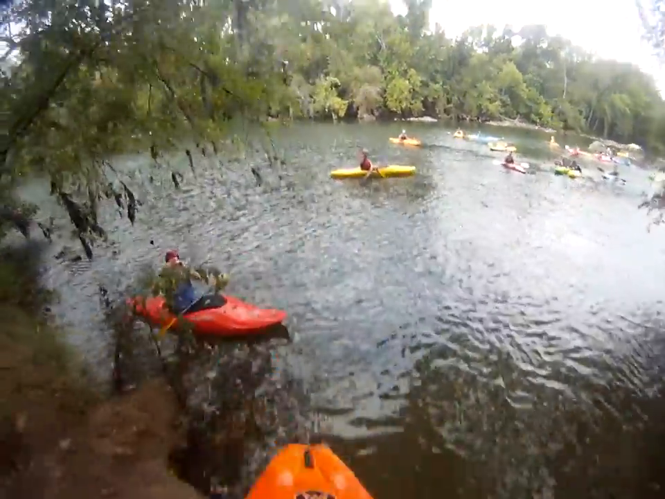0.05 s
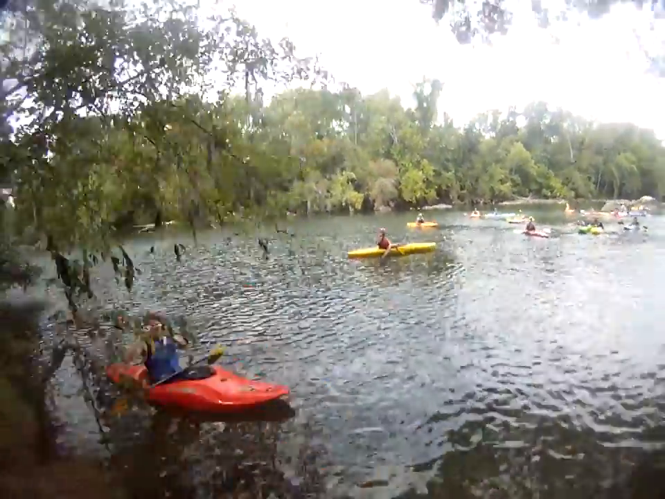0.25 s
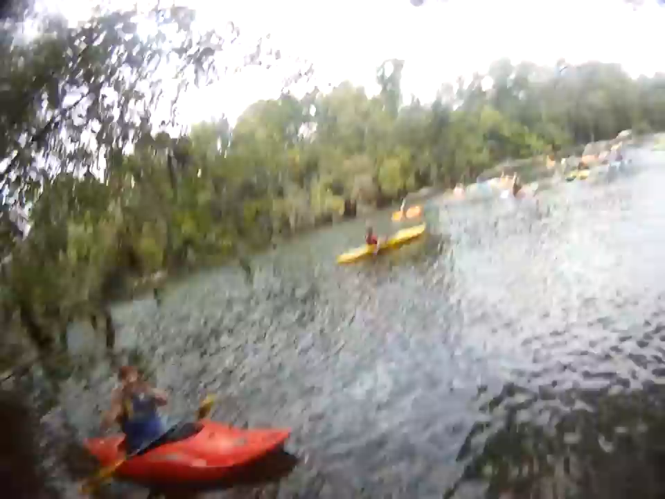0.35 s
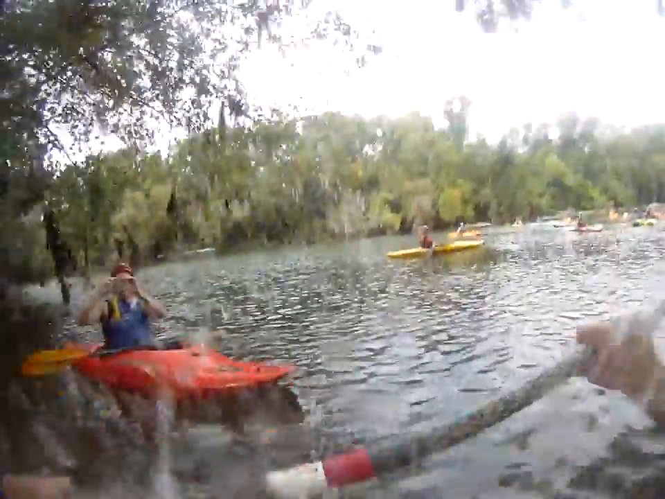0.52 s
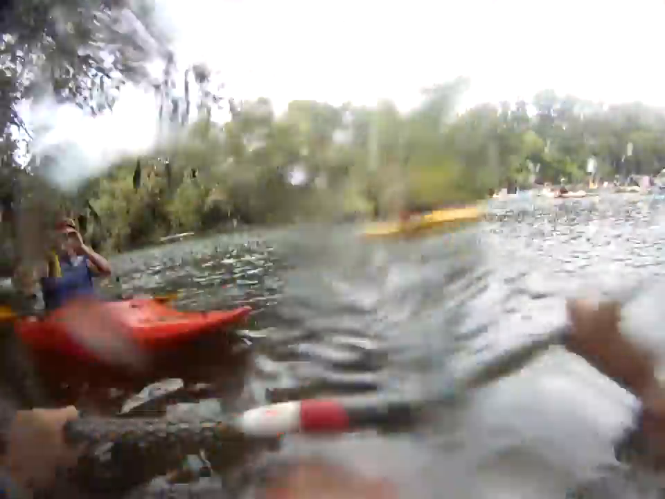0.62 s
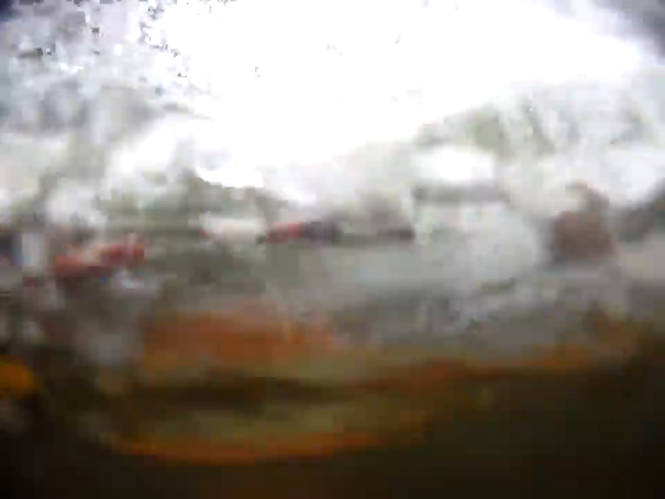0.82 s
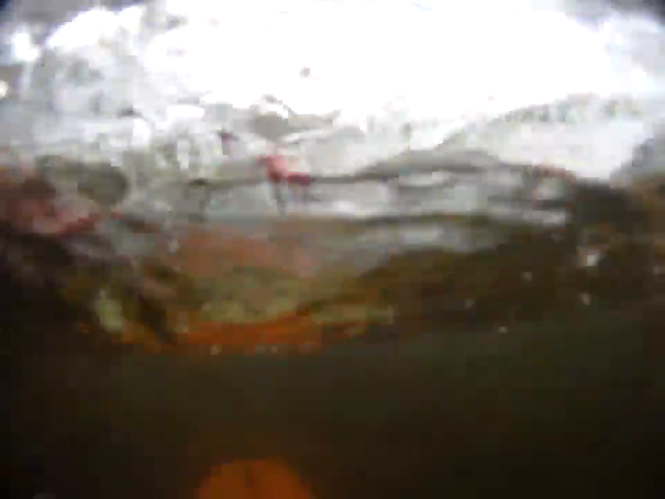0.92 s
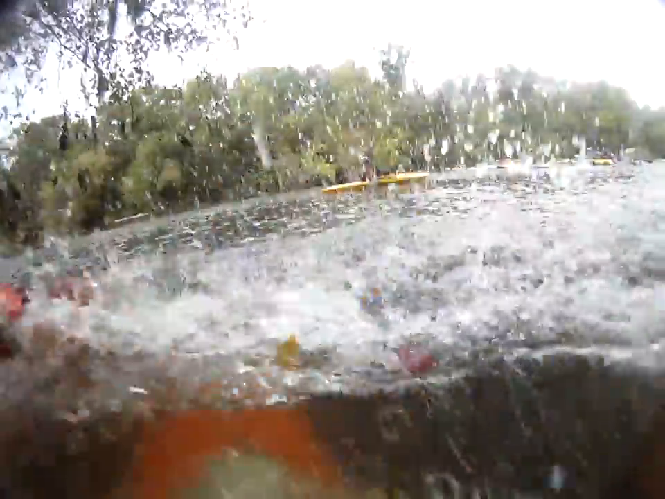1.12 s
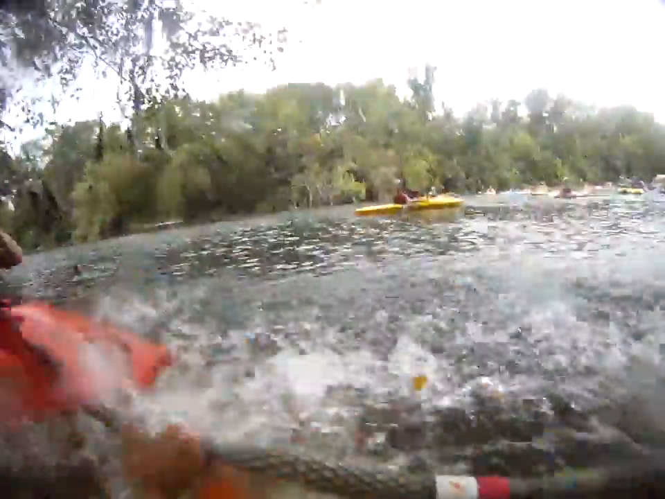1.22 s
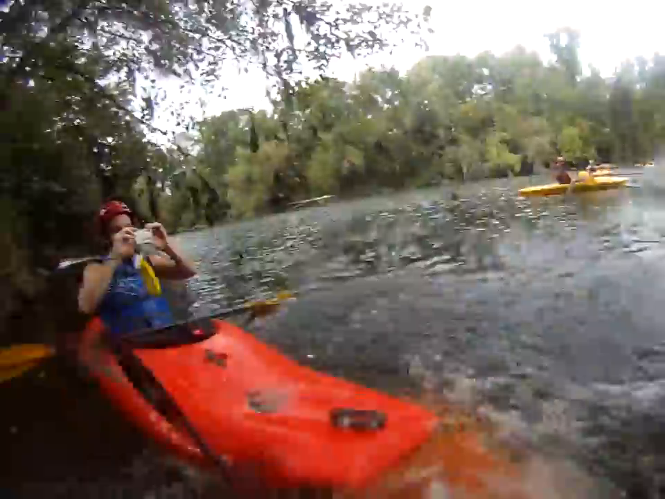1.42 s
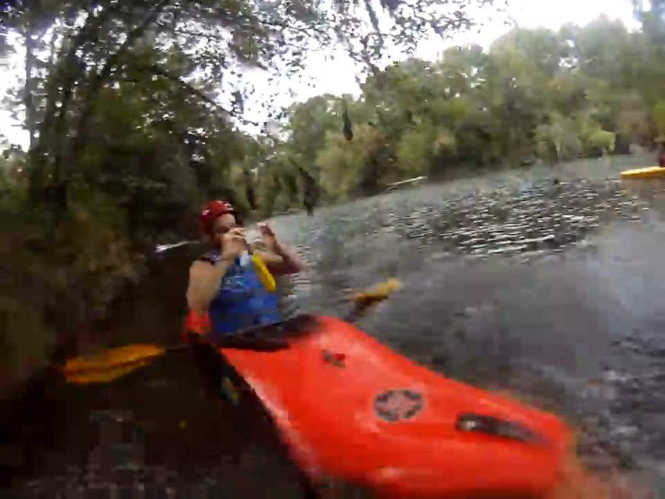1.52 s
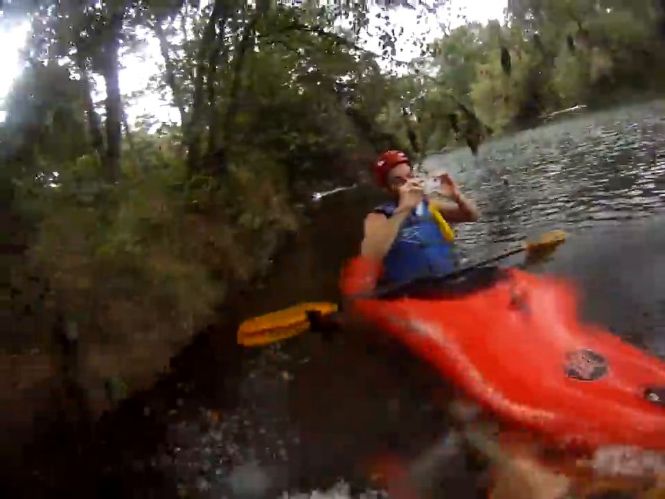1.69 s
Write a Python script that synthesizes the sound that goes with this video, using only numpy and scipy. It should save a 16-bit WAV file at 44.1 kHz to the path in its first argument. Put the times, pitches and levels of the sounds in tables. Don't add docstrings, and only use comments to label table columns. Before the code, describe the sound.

Hollow kayak hull thuds and scrapes on dirt, then plunges into water with crackling splashes and drips

```python
import sys
import numpy as np
from scipy import signal
from scipy.fft import rfft, irfft, next_fast_len
from scipy.io import wavfile
from scipy.ndimage import uniform_filter1d, map_coordinates

SR = 44100
rng = np.random.default_rng(int(sys.argv[2]) if len(sys.argv) > 2 else 0)


def voltage_ratio(level):
    return 10 ** (np.asarray(level, float) / 20)


def materialize(psi):
    bounded = np.clip(np.atleast_2d(psi).T, -1, 1)
    quanta = np.round(bounded * 32767).astype(np.int16)
    wavfile.write(sys.argv[1], SR, quanta)


N = 77175

# (time [s], level [dB])
RIVER_CHURN = [(0, -64), (.03, -57), (.18, -55.5), (.30, -48.5), (.350, -62), (.357, -95), (.41, -57.5),
               (.60, -55), (.63, -44.5), (.72, -35.5), (.82, -24), (.9, -39), (.96, -33), (1.11, -34.5),
               (1.21, -31), (1.27, -30.5), (1.35, -33), (1.75, -35)]
# (frequency [Hz], gain [dB])
HOUSING_TONE = [(300, -11), (830, -5.5), (1150, -7), (1350, 3.5), (2500, 3), (3650, -7), (4000, -11.5),
                (5200, -12.5), (6600, -17)]
SPLASH_S = 0.62


def unit(x):
    return x / np.sqrt(np.mean(x ** 2) + 1e-20)


def along(points, hz):
    f, v = np.transpose(points)
    return np.interp(np.log(hz + 1), np.log(f + 1), v, left=v[0] - 25, right=v[-1] - 25)


def curve(rows):
    s, v = np.transpose(rows)
    return np.interp(np.arange(N) / SR, s, v)


def wobble(rate):
    knots = rng.standard_normal(int(N * rate / SR) + 4)
    return map_coordinates(knots, [np.arange(N) * rate / SR])


def coloured(x, points):
    m = next_fast_len(len(x) + 8192)
    gain = voltage_ratio(along(points, np.fft.rfftfreq(m, 1 / SR)))
    return irfft(rfft(x, m) * gain, m)[:len(x)]


def add(track, s, x):
    part = track[round(s * SR):][:len(x)]
    part += x[:len(part)]


def grains(span_s, hz, cycles, count, size):
    r = rng.random((count, 2))
    spread = np.exp(0.38 * rng.standard_normal(count))
    f = np.clip(hz * spread, 700, 4500)[:, None]
    k = np.arange(400)
    level = voltage_ratio(-3.5 * np.log(0.078 + r[:, 1:]))
    decay = np.exp(-k / SR * f / cycles * 2)
    onset = 1 - np.exp(-k / SR * f * 2)
    wave = level * np.sin(2 * np.pi * f * k / SR) * decay * onset
    at = (r[:, :1] * span_s * SR).astype(int) + k
    return np.bincount(at.ravel(), wave.ravel(), size + len(k))[:size]


def wind():
    # (time [s], level [dB])
    gusts = [(0.0, -21), (0.038, -44), (0.18, -34.5), (0.224, -29), (0.608, -24.5), (0.706, -23.5),
             (0.788, -17), (0.872, -33.5), (1.106, -24.5), (1.324, -28), (1.472, -29), (1.574, -33.5),
             (1.642, -33.5), (1.75, -32)]
    # (frequency [Hz], level [dB])
    rumble_tone = [(15, -18.5), (33, 0), (55, -12), (90, -13), (140, -27.5), (450, -36.5)]
    # (middle [s], length [s], peak [dB], pitch [Hz])
    heaves = [
        (0.066, 0.17, -31, 31.5),
        (0.471, 0.12, -25, 38),
        (0.743, 0.042, -26.5, 57),
        (.922, 0.042, -28, 48),
        (1.126, 0.068, -27.5, 54),
        (1.17, 0.061, -27, 54),
        (1.227, 0.33, -36, 40.2),
        (1.326, 0.3, -21, 31.2),
        (1.563, 0.099, -30, 34.6),
    ]
    t = np.arange(N) / SR
    heave = np.zeros(N)
    for s, length, db, hz in heaves:
        swell = np.exp(-(3 * (t - s) / length) ** 2)
        heave += voltage_ratio(db) * swell * np.sin(2 * np.pi * hz * (t - s))
    hiss = unit(coloured(rng.standard_normal(N), [(200, 14), (800, 2), (3500, -14), (6000, -4)]))
    hiss_db = 0.5 + np.minimum(curve(RIVER_CHURN), -61)
    rumble = unit(coloured(rng.standard_normal(N), rumble_tone))
    rumble_db = curve(gusts) - 6 + 1.4 * wobble(11.24)
    return voltage_ratio(rumble_db) * rumble + heave + voltage_ratio(hiss_db) * hiss


def river():
    z = signal.stft(rng.standard_normal(N), nperseg=512)[2]
    field = uniform_filter1d(uniform_filter1d(rng.standard_normal(z.shape), 5, 0), 6, 1)
    patchy_db = 1 * unit(field)
    hiss = coloured(signal.istft(z * voltage_ratio(patchy_db), nperseg=512)[1][:N], HOUSING_TONE)
    bubbles = grains(N / SR, 2000, 19, count=1200, size=N)
    water = unit(unit(hiss) + voltage_ratio(-14) * unit(bubbles))
    return voltage_ratio(curve(RIVER_CHURN) + 0.6 * wobble(25.15)) * water


def surges():
    # (time [s], length [s], level [dB], pitch [Hz])
    rushes = [(0.188, 0.026, -46, 3300), (.309, 0.009, -33.5, 2040), (0.32, 0.023, -43.5, 1550),
              (0.3401, 0.0046, -19.5, 1680), (0.346, 0.004, -17.5, 1554), (0.42, 0.007, -37, 1010),
              (0.431, 0.084, -51.5, 1980), (0.487, 0.004, -33.5, 1640), (0.497, 0.0043, -34, 2320),
              (0.539, 0.054, -45.5, 1980), (0.559, 0.023, -40.5, 2320), (0.569, 0.0037, -28.5, 860),
              (0.629, 0.066, -28.5, 2930), (.647, 0.035, -17, 2120), (0.681, 0.0268, -25, 2030),
              (0.754, 0.025, -32, 1850), (0.7945, 0.0076, -11.5, 2360), (0.798, 0.037, -18.5, 1980),
              (0.848, 0.035, -30, 2270), (0.931, 0.015, -38, 2090), (1.028, 0.027, -28, 1720),
              (1.061, 0.025, -23.5, 1900), (1.128, 0.025, -30, 1800), (1.163, 0.039, -25, 1655),
              (1.403, 0.0105, -28.5, 1750)]
    # (frequency [Hz], level [dB])
    grit_tone = [(300, -2), (600, 1.5), (840, 9), (1100, -8), (1700, 8.5), (3500, -9), (4300, -12),
                 (6000, -31)]
    attack_s, release_s = 0.00046, 0.00075
    t = np.arange(SR // 10) / SR
    out = np.zeros(N)
    for s, length, db, hz in rushes:
        spray = grains(0.089, hz, 5, count=240, size=len(t))
        spray = unit(coloured(spray, [(600, -18), (1150, -3), (2000, -4), (3600, 3.0), (4300, 2), (6000, 14.5)]))
        dry_bank = s < SPLASH_S
        hiss = coloured(rng.standard_normal(len(t)), grit_tone if dry_bank else HOUSING_TONE)
        hiss = unit(coloured(hiss, [(200, -8), (hz, 0), (6000, -4)]))
        if dry_bank:
            body = voltage_ratio(-2.5) * spray + hiss
        else:
            body = spray + voltage_ratio(-7) * hiss
        gate = np.clip(t / attack_s, 0, 1) * np.exp(-np.clip(t - length, 0, 1) / release_s)
        add(out, s, voltage_ratio(db) * gate * unit(body))
    return out


def hull():
    # (time [s], peak [dB], pitch [Hz], t60 [s], push direction [sign])
    bumps = [(0.23, -10, 89, 0.17, -1), (0.3, -23, 67, 0.035, 1), (0.332, -10.5, 73, 0.042, 1),
             (0.3406, 8, 151, 0.017, -1), (0.344, 13, 156, 0.02, 1), (0.3504, -12.5, 94, 0.14, 1),
             (.420, -12, 95.7, 0.2, -1), (0.478, -12, 69.8, 0.12, 1), (0.4848, -5.5, 90, 0.084, -1),
             (.494, -6, 100, 0.11, 1), (0.572, -11, 140, 0.056, 1), (0.5769, -8.5, 90, 0.053, 1),
             (0.5828, -5.5, 80.4, 0.064, -1), (0.770, -10.5, 50, 0.13, 1), (0.787, -7.5, 111, 0.063, 1),
             (0.789, -10.5, 260, 0.032, 1), (0.932, -27, 97.5, 0.46, 1), (1.026, -19, 236.4, 0.092, -1),
             (1.028, -13, 84, 0.046, 1), (1.187, -18, 117, 0.021, 1), (1.729, -28, 102, 0.16, 1)]
    attack_s = 0.0024
    shell_hz, shell_db, shell_t60_s, loudest_bump_db = 835, -25.5, 0.04, -8
    t = np.arange(SR // 2) / SR
    out = np.zeros(N)
    for s, db, hz, t60, push in bumps:
        if s < SPLASH_S:
            ring_db = min(db, loudest_bump_db) + shell_db - 60 * t / shell_t60_s
            add(out, s, voltage_ratio(ring_db) * np.sin(2 * np.pi * shell_hz * t))
        onset = 1 - np.exp(-(t / attack_s) ** 2)
        boom = voltage_ratio(db - 60 * t / t60) * np.sin(2 * np.pi * hz * t) * onset
        add(out, s, np.sign(push) * boom)
    return out


def slaps_and_drops():
    # (middle [s], peak [dB], pitch [Hz], half length [ms])
    slaps = [(0.3419, -17, 3230, 0.54), (0.3444, -12, 1673, 1.7), (0.3477, -12, 1890, 0.48),
             (0.3472, -18.5, 3460, 0.78), (0.4848, -18, 1780, 0.53), (.4975, -35, 3560, 1.3),
             (.5485, -34, 1800, 1.3), (.577, -31.5, 3520, 1.2), (0.577, -30.5, 1640, 1.43),
             (.632, -24, 2120, 0.93), (.6425, -30, 3450, 0.8), (0.6485, -9, 1990, 1.05),
             (.654, -9, 2420, 0.52), (0.6581, -2, 3340, 0.56), (.6586, -0.5, 2150, 0.64),
             (0.6625, -9.5, 3360, .6), (.664, -12, 2160, 1.3), (0.667, -6, 2530, 0.57),
             (0.6725, -4, 1750, 0.64), (.673, -1, 3360, 0.4), (0.6752, -4.5, 1940, 1.06),
             (.6768, -6, 2280, 0.63), (.681, -8, 2300, 0.68), (0.7167, -24, 2110, 0.79),
             (0.755, -21, 1830, 1.05), (0.756, -28.5, 3450, 1.2), (.7596, -20, 2150, 1),
             (0.7965, -0.5, 1910, 1.02), (0.7986, -7.5, 2740, 0.35), (.8068, -13, 1300, 0.82),
             (0.8122, -10, 2000, 0.62), (0.8192, -6, 1860, 1.9), (.8207, -24, 1450, 0.48),
             (0.8295, -8.5, 1860, 1.03), (0.8349, -11.5, 1890, 1.3), (0.8366, -20.5, 1265, 3.55)]
    # (middle [s], peak [dB], pitch [Hz], half length [ms])
    runoff = [(0.8697, -8, 2530, 0.64), (0.876, -21.5, 1710, 1.34), (.878, -24, 3600, 1.06),
              (.9345, -33, 860, 3.7), (.935, -27, 3630, 0.79), (0.9413, -24.5, 2280, 1.8),
              (0.9433, -29, 3800, 1.4), (0.9556, -30, 3150, 0.93), (0.9789, -16, 920, 0.38),
              (0.9828, -20, 1280, 1.7), (0.9847, -26, 2400, 1.03), (.993, -23, 1750, 1.7),
              (0.9982, -9.5, 2100, 0.33), (1.013, -22, 660, .6), (1.0297, -17, 1670, 1.44),
              (1.0357, -2, 2550, 0.62), (1.0363, -3, 4120, .7), (1.0372, 1.5, 3200, 0.53),
              (1.0391, -6.5, 3600, .6), (1.0413, -10, 1750, 2.04), (1.065, -11, 2220, 1.2),
              (1.0745, -6, 3110, 0.5), (1.0744, -4, 2500, 1.3), (1.0776, -7, 3600, 0.59),
              (1.1028, -20.5, 1900, 0.81), (1.1371, -11.5, 2050, 0.58), (1.154, -22, 2320, 0.85),
              (1.1689, -17, 1823, 1.52), (1.1751, -3.5, 2925, 0.65), (1.1757, -15.5, 1950, 2.23),
              (1.1941, -13.5, 2570, 0.92), (1.194, -15.5, 4940, 0.28), (1.1946, -8.5, 1885, 1.04)]
    lopsided = 1.57
    t = np.arange(-SR // 50, SR // 50) / SR
    out = np.zeros(N)
    for s, db, hz, half_ms in [*slaps, *runoff]:
        half = half_ms / 1000
        spread = half * np.where(t > 0, lopsided, 1 / lopsided)
        ring = np.exp(-0.5 * (t / spread) ** 2) * np.sin(2 * np.pi * (hz * t + rng.random()))
        tick = voltage_ratio(-15) * np.exp(-(t / 0.0003) ** 2) * np.diff(rng.standard_normal(len(t) + 1))
        add(out, s + t[0] - half / 2, voltage_ratio(db) * (ring + tick))
    return out


def pops():
    # (time [s], peak [dB], pitch [Hz], t60 [s])
    rings = [(.652, -15, 1177, 0.14), (.692, -15, 2130, 0.02), (0.787, -14, 835, 0.082),
             (1.0553, -15, 3360, 0.013), (1.077, -8, 3600, .02), (1.074, -14, 1156, 0.055),
             (1.082, -17, 1007, 0.031), (1.094, -26, 908, 0.058), (1.091, -14.5, 4230, 0.0035),
             (1.182, -16, 4700, 0.004), (1.186, -20.5, 775, 0.091), (1.407, -29, 846, 0.049)]
    attack_s, crack_t60_s = 0.00056, 0.0032
    t = np.arange(SR // 8) / SR
    out = np.zeros(N)
    for s, db, hz, t60 in rings:
        waver = 0.071 * np.cumsum(uniform_filter1d(rng.standard_normal(len(t)), size=12))
        sag = 1 - 0.0504 * t / t60
        ring = np.sin(2 * np.pi * hz * t * sag + waver) * (1 - np.exp(-t / attack_s))
        ring_db = db - 60 * (t / t60) ** 1.15
        crack = rng.standard_normal(len(t))
        crack = unit(coloured(crack, [(hz / 3, -22), (hz, 0), (hz * 2, -9), (hz * 4, -22)]))
        crack_db = db - 8 - 60 * t / crack_t60_s
        add(out, s, voltage_ratio(ring_db) * ring + voltage_ratio(crack_db) * crack)
    return out


def scene():
    return (wind() + river() + surges() + hull() + slaps_and_drops() + pops())[None]


def roll_off(x):
    return signal.sosfilt(signal.butter(12, 15880, fs=SR, output="sos"), x)


def record(dry):
    heard = coloured(dry[0], [(0, 1.5), (5300, 0), (6000, -6.5), (7000, -30)])
    hold_hz, clip = 12000, 0.97
    slow = signal.resample_poly(heard, hold_hz // 300, SR // 300)
    slow = slow / (1 + np.abs(slow / clip) ** 16) ** (1 / 16)
    held = signal.resample_poly(np.repeat(slow, 4), 147, 160)
    held = np.pad(held, (0, N))[:N]
    held = coloured(held, [(0, 0), (5000, 0), (9000, 0), (14800, 0.2), (15300, -6), (15800, -14)])
    return roll_off(held[None])


dry = scene()
out = record(dry)
materialize(out)
```